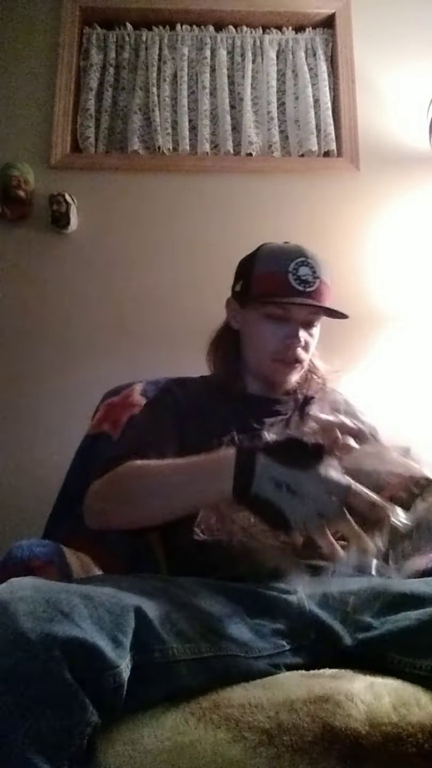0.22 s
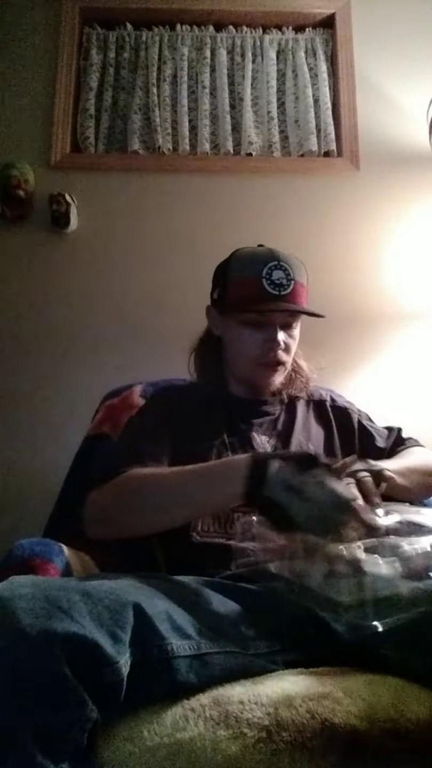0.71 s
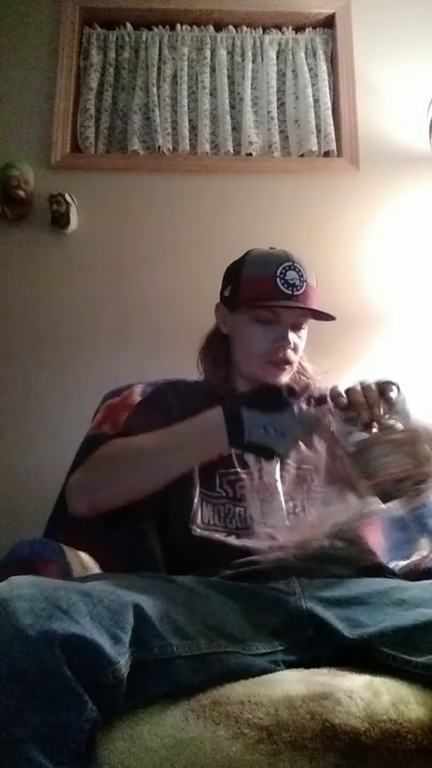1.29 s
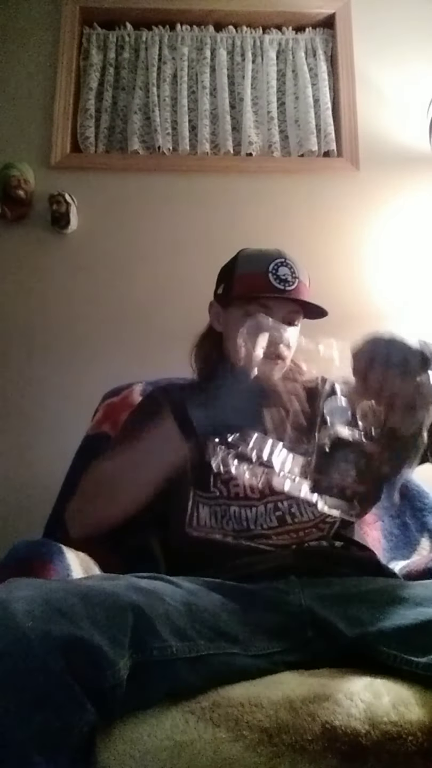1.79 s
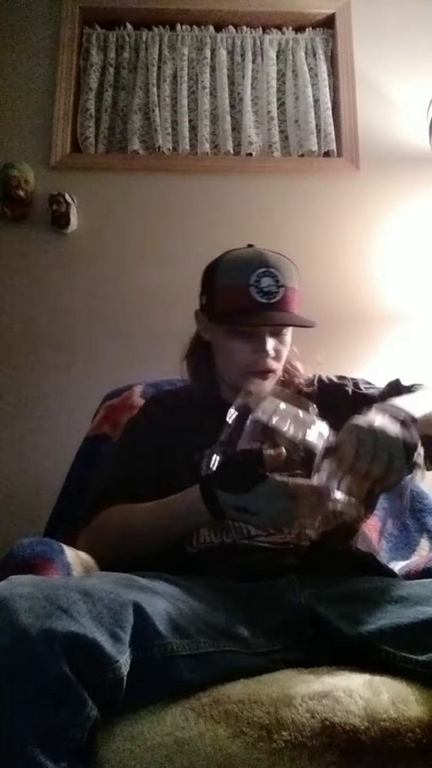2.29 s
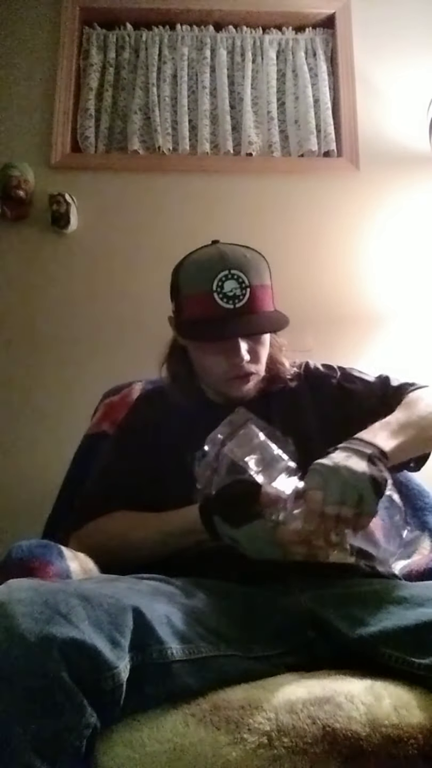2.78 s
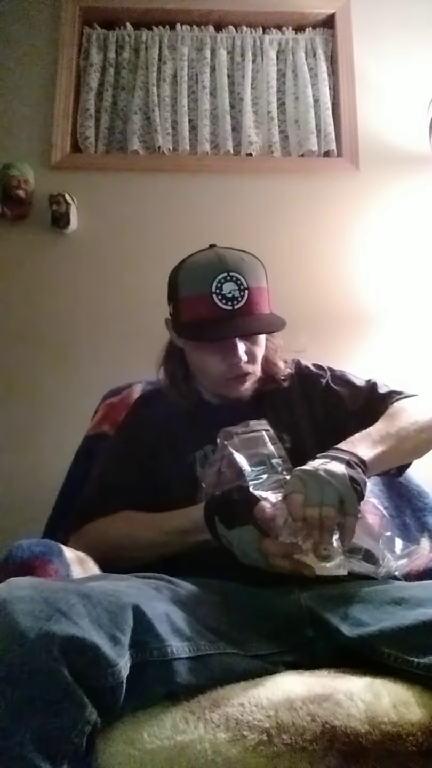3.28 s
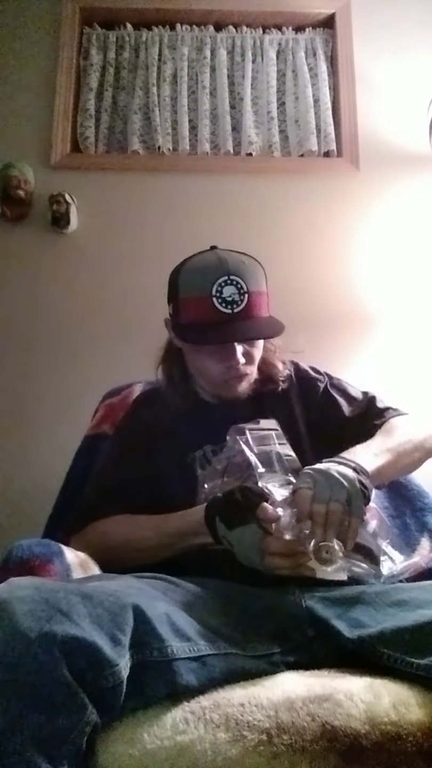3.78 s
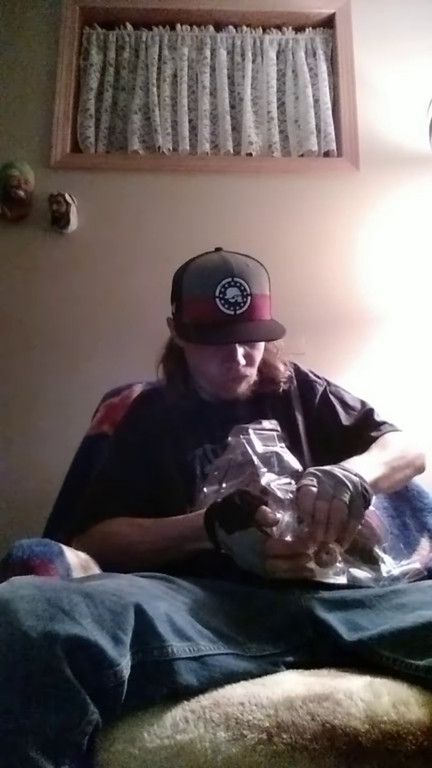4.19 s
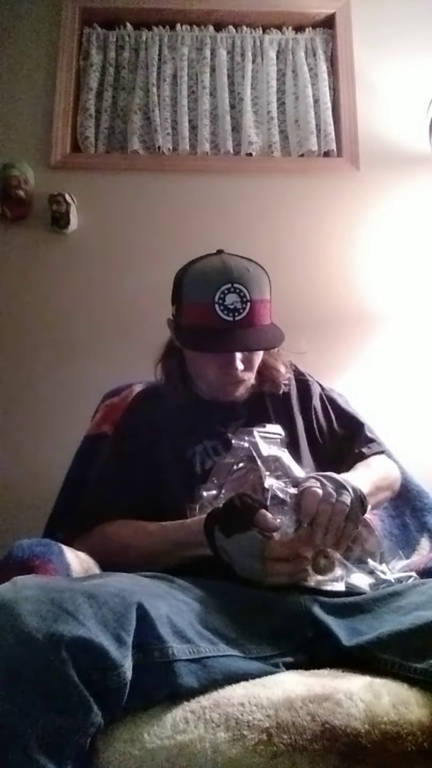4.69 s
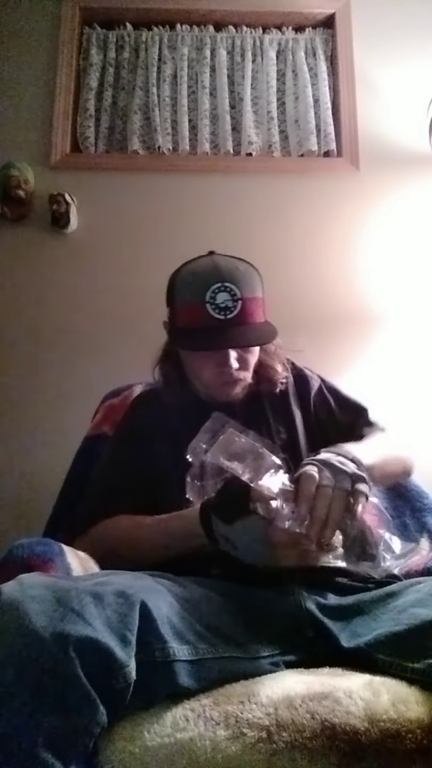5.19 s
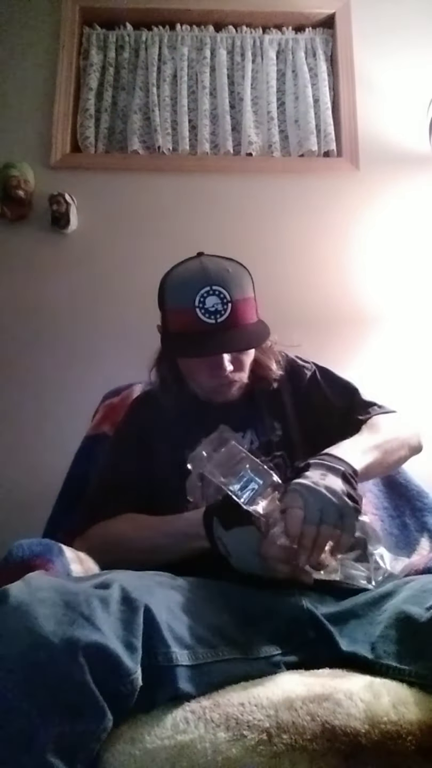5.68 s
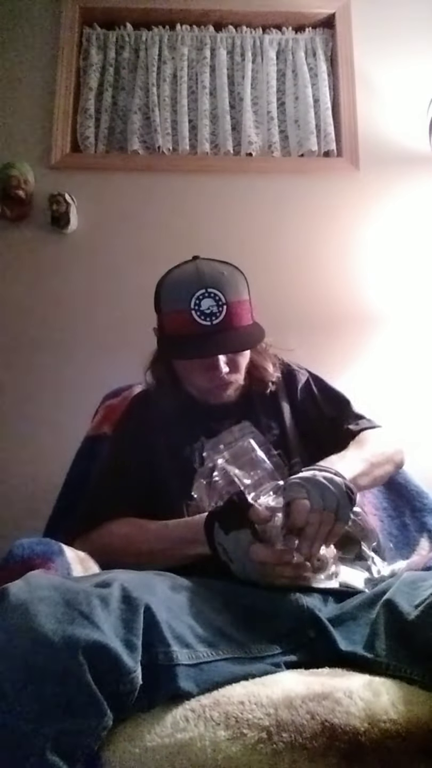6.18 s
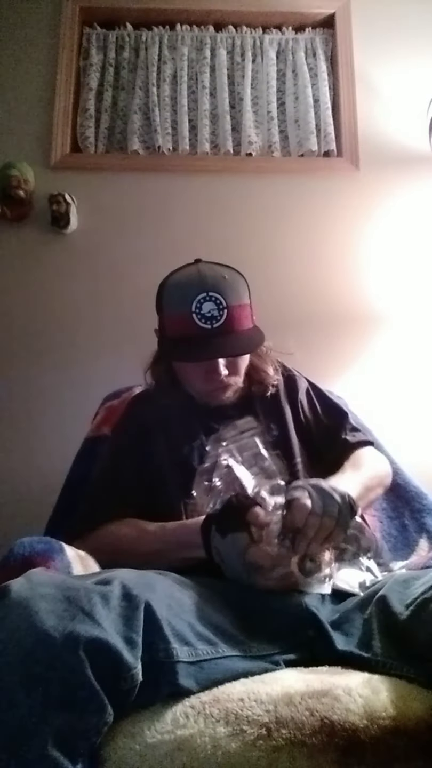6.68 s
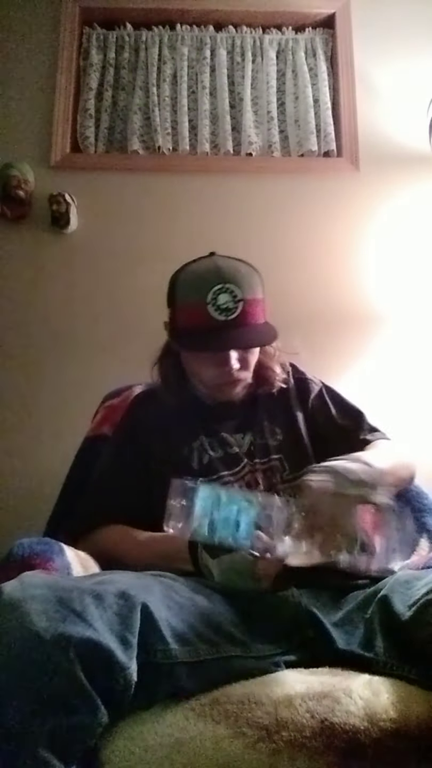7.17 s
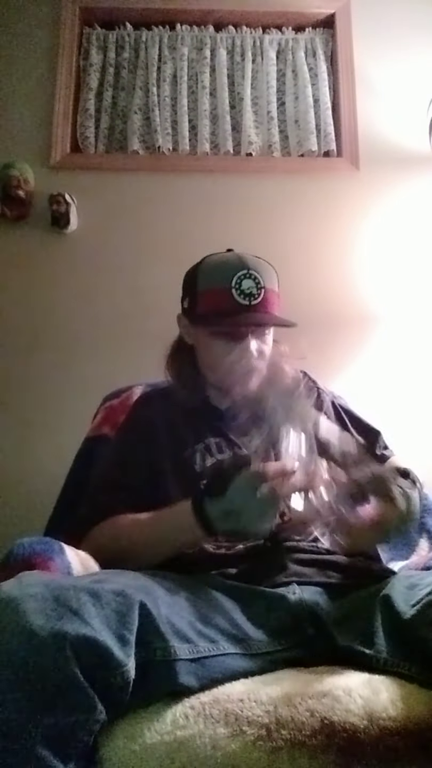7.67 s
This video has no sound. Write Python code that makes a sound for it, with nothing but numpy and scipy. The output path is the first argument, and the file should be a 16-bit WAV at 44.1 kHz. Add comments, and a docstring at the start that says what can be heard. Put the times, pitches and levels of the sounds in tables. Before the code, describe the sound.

Stiff plastic packaging is pulled and crushed by hand near the microphone, crackling irregularly throughout. A small cluster of snaps comes at about 0.3 seconds, followed by a brief lull and louder pops from 1 to 1.5 seconds. Sharp, bright cracks and hollow pops crowd together between 2 and 3 seconds. Uneven crinkling continues, with two tiny creaks and a strong snap around 3.5 seconds, then a loud, rustling crunch near 5 seconds. Lighter, crisp ticks lead into the densest crushing, from about 6.4 to 7 seconds. After a half-second pause, a few duller pops come around 7.6 seconds and die away. Soft, low thumps of hands on lap and chair sit underneath, clearest near 2.5 and 6.5 seconds. The room is small and furnished, with a short echo and a very faint hush.

```python
"""Creases snap in stiff clear plastic packaging as hands pull it apart and crush it.
Each crease that buckles releases its elastic energy as a crack, a bright edge, a knock and the pop
of the panel around it. Between snaps the film rubs, small creases crackle, folds creak by stick-slip
and the hands thud on lap and chair. A small furnished room answers with early echoes and a short
tail, over a faint hush."""
import sys
import numpy as np
from scipy import signal
from scipy.fft import rfft, irfft, next_fast_len
from scipy.io import wavfile

SR = 44100
rng = np.random.default_rng(int(sys.argv[2]) if len(sys.argv) > 2 else 0)


def put_to_file(sound):
    """Save the sound as 16-bit audio at rate SR, in the file named by the first command-line argument."""
    columns = np.atleast_2d(sound).T  # one column per channel
    safe = np.clip(columns, -1, 1)
    whole_steps = np.round(safe * 32767)
    wavfile.write(sys.argv[1], SR, whole_steps.astype(np.int16))


N = 348831


def from_db(db):
    """Amplitude ratio of a level: a factor of ten per 20 dB."""
    return 10 ** (np.asarray(db) / 20)


def rms_one(x):
    """Normalisation to unit mean power."""
    return x / np.sqrt(np.mean(x ** 2) + 1e-20)


def peak_one(x):
    """Normalisation to unit peak amplitude, row by row."""
    return x / (np.abs(x).max(axis=-1, keepdims=True) + 1e-20)


def at_hz(points, hz, column=1):
    """Interpolation of a table along a logarithmic frequency axis."""
    points = np.array(points)
    return np.interp(np.log(hz + 1), np.log(points[:, 0]), points[:, column])


def colour(x, points):
    """Zero-phase filtering by a curve of f/Hz, level/dB."""
    size = next_fast_len(len(x))
    gain = from_db(at_hz(points, np.fft.rfftfreq(size, 1 / SR)))
    return irfft(rfft(x, size) * gain, size)[:len(x)]


def band(x, low_hz, high_hz, order=2):
    """Causal band-pass filtering."""
    sos = signal.butter(order, [low_hz, min(high_hz, .45 * SR)], "band", fs=SR, output="sos")
    return signal.sosfilt(sos, x + 1e-18)


def ring(x, hz, t60):
    """Damped harmonic oscillator driven by x; its free vibration falls 60 dB in t60 seconds."""
    r, w = from_db(-60 / (t60 * SR)), 2 * np.pi * hz / SR
    return signal.lfilter([0, np.sin(w)], [1, -2 * r * np.cos(w), r * r], x + 1e-18)


# Spectrum of the still room: f/Hz, relative spectral level/dB
HUSH_SPECTRUM = [(24, -44), (40, 43), (140, 44), (337, -42), (663, -8.5), (1210, -65), (3060, -64),
                 (8340, -24.5), (11300, 12.5), (16000, 14.5)]

def hush(level_db=-69):
    """Stationary background noise, with most of its power in the bass."""
    return from_db(level_db) * rms_one(colour(rng.standard_normal(N), HUSH_SPECTRUM))


# Early reflections from walls and ceiling: delay/s, level/dB
EARLY_ECHOES = [(.0088, -12), (0.0105, -39.5), (0.018, -35.5), (.0245, -43)]
# Reverberant tail: f/Hz, relative level/dB, T60/s
REVERB_BANDS = [(148.6, -21.5, 0.14), (430, -1.5, 0.12), (1000, -12, 0.26), (2200, -5, 0.17),
                (3740, -10.5, 0.15), (7020, -16.5, 0.26), (9100, -13, 0.17), (13000, -17, 0.12)]

def reflections(smear_t60=.0078):
    """Impulse response: rough surfaces scatter each echo, then a diffuse field decays band by band."""
    t = np.arange(round(.4 * SR)) / SR
    response = np.zeros(len(t))
    for delay, db in EARLY_ECHOES:
        decay = (t >= delay) * from_db(-60 * np.maximum(t - delay, 0) / smear_t60)
        smear = rng.standard_normal(len(t)) * decay
        response += from_db(db) * smear / np.sqrt(np.sum(smear ** 2))
    edges_hz = 60 * 2 ** np.arange(0, 8.6, .5)   # half octaves
    build_up = np.clip((t - .006) / .00096, 0, 1)
    for low, high in zip(edges_hz, edges_hz[1:]):
        hz = np.sqrt(low * high)
        decay = from_db(at_hz(REVERB_BANDS, hz) - 60 * t / at_hz(REVERB_BANDS, hz, column=2))
        response += .063 * build_up * decay * band(rng.standard_normal(len(t)), low, high)
    return response


def room(x, positions=8, moves_per_s=10):
    """Time-varying convolution: the moving packaging fades from one set of reflections to the next."""
    position = np.arange(N) / SR * moves_per_s % positions
    out = x.copy()
    for k in range(positions):
        distance = np.abs((position - k + positions / 2) % positions - positions / 2)
        power_share = np.clip(1 - distance, 0, 1)
        out += signal.oaconvolve(x * np.sqrt(power_share), reflections())[:N]
    return out


# Hands knocking on lap and chair: t/s, peak level/dB, f/Hz
HAND_KNOCKS = [(0.239, -14.5, 109.6), (1.34, -15, 136), (2.494, -10.5, 73), (2.853, -15.5, 111),
               (3.468, -34, 127), (3.556, -39, 90.4), (3.678, -18, 123), (5.025, -30, 125.7),
               (5.206, -27.5, 137), (5.802, -33, 129), (5.943, -18, 88.8), (6.526, -6.5, 91),
               (6.694, -13.5, 91.5), (6.994, -28, 78.1)]

def thuds(cycles=7):
    """Soft impact: a smooth force pulse excites one low, heavily damped mode."""
    out = np.zeros(N)
    for start, db, hz in HAND_KNOCKS:
        i = round(start * SR)
        force = np.zeros(min(N - i, 9000))
        force[:200] = np.hanning(200)   # 4.5 ms of contact
        out[i:i + len(force)] += from_db(db) * peak_one(ring(force, hz, cycles / hz))
    return out


def flicker(per_s, depth_db):
    """Random amplitude modulation: the level glides between normally distributed values."""
    steps = rng.standard_normal(round(N / SR * 60) + 2)
    return from_db(depth_db * np.interp(np.arange(N) / SR * per_s, np.arange(len(steps)), steps))


def grains(per_s, spread_db, pitches_hz, cycles):
    """Shot noise: random impulses of uneven size, each exciting one short resonance."""
    sizes = from_db(spread_db * np.minimum(rng.exponential(1, N), 4)) * rng.choice([-1, 1], N)
    impulses = sizes * (rng.random(N) < per_s / SR)
    mode = rng.integers(0, len(pitches_hz), N)
    return rms_one(sum(ring(impulses * (mode == k), hz, cycles / hz) for k, hz in enumerate(pitches_hz)))


def stirred(steady_db, snap_times, stir_db, t60=.14):
    """Incoherent addition: the gain of a steady power plus the decaying power that each snap leaves."""
    jolts = np.zeros(N)
    jolts[np.round(snap_times * SR).astype(int)] = from_db(2 * stir_db)
    settling = signal.lfilter([1], [1, -from_db(-120 / (t60 * SR))], jolts + 1e-18)
    return np.sqrt(from_db(2 * steady_db) + settling)


# Course of the handling: t/s, rubbing level/dB, panel rumble level/dB
HANDLING_LEVELS = [(0,-49,-38.5),(.12,-41.5,-38),(.48,-39,-32.5),(.66,-60,-50),(.85,-46.5,-68),(.98,-57.5,-44),(1.1,-38.5,-43.5),(1.47,-38,-21),(1.7,-64.5,-57.5),(2.02,-62,-66),(2.14,-38.5,-32),(2.65,-44,-37.5),(3.2,-67,-70.5),(3.6,-33.5,-34),(3.9,-52.5,-64),(4.3,-50.5,-48.5),(4.72,-74.5,-63.5),(4.86,-23.5,-31),(5.07,-31.5,-21.5),(5.17,-51,-39),(5.7,-53,-59),(6.3,-54.5,-67),(6.75,-35.5,-31.5),(7.0,-46,-21.5),(7.17,-67.5,-54),(7.385,-66,-68),(7.408,-36,-43),(7.55,-81,-72),(7.91,-78,-60)]
# Film sliding on film: f/Hz, relative spectral level/dB
FRICTION_SPECTRUM = [(1500, -31), (2600, -11.5), (4300, -4), (5300, -5.5), (6800, -3.5), (8500, -5.5),
                     (11000, -4), (16000, -13.5)]

def handling():
    """Friction and flexure: film rubs, small creases tick, panels bend with the cloth under them."""
    times, *levels = np.transpose(HANDLING_LEVELS)
    rub_db, rumble_db = [np.interp(np.arange(N) / SR, times, db) for db in levels]
    rub = rms_one(colour(rng.standard_normal(N), FRICTION_SPECTRUM)) * flicker(per_s=40, depth_db=2.5)
    creases = grains(per_s=500, spread_db=4, pitches_hz=np.geomspace(5500, 15000, 6), cycles=6)
    panels = grains(per_s=2500, spread_db=4, pitches_hz=np.geomspace(330, 2400, 10), cycles=6.2)
    cloth = grains(per_s=170, spread_db=1, pitches_hz=np.geomspace(60, 200, 4), cycles=8.1)
    snap_times, _, pop_db, crack_db, _ = np.transpose(BUCKLING_CREASES)
    film_gain = stirred(rub_db, snap_times, crack_db - 26)
    flex_gain = stirred(rumble_db, snap_times, pop_db - 18)
    return film_gain * (rub + creases) + flex_gain * (panels + from_db(-11) * cloth)


# Creaking folds: start t/s, end t/s, first and last slip rate/Hz, panel level/dB, film level/dB
SLIPPING_FOLDS = [(3.29, 3.353, 230, 280, -28, -29), (3.4925, 3.536, 210, 370, -32, -21)]
# Modes of a fold, the panel's first, then the film's: f/Hz, T60/s, relative level/dB
FOLD_MODES = [(1650, .012, 0), (3950, .006, -8), (5500, .005, -2), (7000, .006, -2), (14500, .003, -5)]

def creaks(unevenness=.2):
    """Stick-slip friction: a fold yields in quick, nearly periodic slips that ring panel and film."""
    (panel_hz, panel_t60, _), *film_modes = FOLD_MODES
    out = np.zeros(N)
    for start, stop, first_rate, last_rate, panel_db, film_db in SLIPPING_FOLDS:
        i = round(start * SR)
        n = round(stop * SR) - i
        jitter = np.repeat(rng.standard_normal(n), 150)[:n]
        slip_rate = np.linspace(first_rate, last_rate, n) * from_db(8.7 * unevenness * jitter)
        slip_count = np.floor(np.cumsum(slip_rate / SR))
        slips = np.diff(slip_count, prepend=-1) * from_db(rng.normal(0, 1.5, n))
        slips = np.pad(slips, (0, 600))   # time to ring out
        panel = band(ring(slips, panel_hz, panel_t60), .75 * panel_hz, 1.4 * panel_hz)
        film = sum(from_db(db) * ring(slips, hz, t60) for hz, t60, db in film_modes)
        out[i:i + len(slips)] += from_db(panel_db) * panel + from_db(film_db) * film
    return out


def bursts(noise, release_s):
    """Broadband transients, one per row: noise swells and decays, and its spectrum is whitened."""
    age = np.arange(noise.shape[1]) / SR / release_s[:, None]
    envelope = (1 - np.exp(-age / .038)) * from_db(-60 * age)
    spectrum = rfft(noise * envelope)
    whitened = irfft(spectrum / (np.abs(spectrum) + 1e-20), noise.shape[1])
    return whitened * envelope ** .3   # trims what whitening spreads in time


def panel_pops(kicks, pitches_hz, cycles=9):
    """Forced vibration: each kicked panel rings at its pitch over a broader body reaching below it."""
    tones = [ring(kick, hz, cycles / hz) for kick, hz in zip(kicks, pitches_hz)]
    bodies = [band(kick, hz / 2.4, hz * 1.7, order=3) for kick, hz in zip(kicks, pitches_hz)]
    return peak_one(np.array(tones)) + .91 * peak_one(np.array(bodies))


# Snaps of the creases: t/s, panel f/Hz, pop level/dB, crack level/dB, bright edge level/dB
BUCKLING_CREASES = [(0.066,1700,-27,-18,-20),(0.2029,1005,-23,-30,-21.5),(.3084,900,-24.5,-38,-10),(0.3173,910,-17,-30,-7),(.323,1190,-45,-10,-7),(.337,1220,-23.5,-9.5,-12.5),(0.3457,1510,-12.5,-16,-3),(0.385,1170,-9.5,-11.5,-11),(.6254,1900,-29.5,-38,-52),(0.7106,1210,-60,-50,-23),(0.7648,1230,-20.5,-33,-43),(0.894,2040,-36,-48,-41),(0.953,1190,-29.5,-57,-50),
                    (1.002,500,-21.5,-17.5,-28),(1.0152,622,-14,-9,-13),(1.0434,647,-23.5,-10,-6),(1.0595,1260,-9,-14,-7),(1.1773,1770,-14.5,-44,-33),(1.1969,1005,-12,-11.5,-16),(1.2153,640,-9,-14,-24.5),(1.2465,960,-14.5,-11.5,-34),(1.253,1860,-13,-10,-17.5),(1.3191,1280,-22.5,-27,-29.5),(1.3363,1660,-5,-1.5,-3.5),(1.407,1000,3,3,-9.5),(1.4363,1018,-24,-10.5,-20),(1.5362,1280,-19.5,-23.5,-20),(1.6191,583,-13,-28.5,-30),(1.692,544,-42.5,-18.5,-24),(1.7596,2150,-34.5,-27,-17.5),(1.803,2260,-49,-14.5,-8),(1.81,2260,-41,-10,-20),(1.825,1540,-66,-17,-6),(1.9447,572,-33,-27,-14.5),(1.978,1570,-51,-27.5,-16),
                    (2.009,2200,-31,-37,-33),(2.04,1580,-16,-8.5,-3),(2.0918,1490,-1,12.5,-15),(2.1283,1590,-12,-22,-6),(2.1867,580,-17,-18.5,-16),(2.224,1500,-11,-2,7),(2.235,1670,-18,-19,-1.5),(2.2609,530,-16.5,1,8),(2.3143,510,-17.5,-8,-15),(2.323,1370,-13,-16,-25),(2.4028,2200,-8.5,-5.5,-1),(2.44,520,-27,-40,-45),(2.4587,860,-5.5,2,3.5),(2.4915,1355,6,8,12),(2.5524,1490,-14,-0.5,-6.5),(2.6016,1410,0.5,4.5,-5),(2.6117,1270,-6,-0.5,-17),(2.671,1576,-14.5,-15.5,-41),(2.7688,1584,-49,-20,-23),(2.7939,1630,-25,-11,-3),(2.801,1430,-47,-2.5,-26),(2.8205,1440,-18.5,-15,-14),(2.8463,1885,-0.5,5.5,6),(2.9707,1540,-8.5,-0.5,-3.5),
                    (3.015,1840,-15.5,-14.5,-12),(3.0716,2220,-12,-8.5,-14),(3.1135,2500,-26.5,-4,-19),(3.152,1300,-25,-2.5,1),(3.17,1390,-53,-32,-4),(3.264,1820,-36,-38,-39),(3.2772,1730,-46,-20.5,-15),(3.3569,2080,-44.5,-13,-10),(3.415,2500,-38.5,-23,-30),(3.4298,1650,-8.5,-17,-21),(3.4515,1550,-20.5,-22,-36.5),(3.4743,1640,-36,-22,-32),(3.4862,1710,-39,-19,-35),(3.5391,1260,-10.5,-14,-20),(3.552,1100,-11.5,-25.5,-23),(3.5674,1166,-1,9.5,9.5),(3.662,1250,-7.5,-5,1.5),(3.7106,2195,-12.5,1.5,4),(3.75,1200,-42,-26,-21),(3.777,1200,-40,-20.5,-20),(3.798,980,-28,-4.5,-11),(3.828,1500,-34,-27,-31),(3.865,1500,-39.5,-25,-32),(3.885,1500,-49,-37,-22),(3.917,2150,-35,-29,-24),(3.9293,830,-25,-20,-32.5),(3.9357,1204,1,3.5,-3.5),
                    (4.0429,1240,-22.5,-13,-5),(4.071,1390,-20,-16,-1),(4.1035,1140,-8,-1.5,4.5),(4.133,1740,-22,-12,-22),(4.1955,1190,-19.5,-16,-13),(4.2039,1010,-22,-8,-5),(4.233,2400,-23,-7.5,-3),(4.2555,890,-32.5,-27,-25),(4.3482,1090,-10.5,-7.5,-2),(4.3944,517,-15.5,-5.5,-21),(4.45,1350,-27,-13.5,-11),(4.5245,1410,-46,-15.5,-4.5),(4.536,850,-34,-29,-10),(4.5722,1100,-4.5,4,2),(4.597,1030,-20.5,-30.5,-11.5),(4.681,1980,-41,-41,-26),(4.7566,1400,-37,-10.5,-5),(4.8066,1010,-62.5,-10.5,-4),(4.8103,1200,-56,-25,0),(4.828,1110,-8.5,-14,-9),(4.8443,1700,-22,-6,-8.5),(4.8627,1950,-5.5,-12,1.5),(4.8871,880,-8,-12,-12.5),(4.8992,613,-7.5,1,18.5),(4.9176,750,-3.5,6.5,-3),(4.9437,1750,-4,-26,-24),(4.9636,1320,-2.5,10,14),(4.9964,1296,-7,-4,-11),
                    (5.025,1270,-3.5,-2,2),(5.036,2020,-13,-21,-3),(5.0633,1320,-6.5,-6.5,-15),(5.0791,1274,-14.5,-9,-3),(5.1015,1950,-17,-33,-14),(5.1687,2440,-23.5,-13,-40),(5.2168,2440,-5,-6.5,-5),(5.2701,1270,-11.5,-10.5,-5.5),(5.2793,2340,-33,-8,-14),(5.299,1360,-39.5,-7.5,-7),(5.323,1000,-22,-14,-32),(5.3358,2440,-18.5,-9.5,-19),(5.369,2400,-22,-10.5,-19),(5.401,1190,-25,-29,-30),(5.414,1160,-21,-19,-19),(5.4512,1140,-27,-7,-12),(5.4563,1300,-10.5,-18.5,-17),(5.476,1300,-30.5,-24,-17.5),(5.5023,1250,-46,-12,-19),(5.512,1270,-54,-11,-4),(5.5244,2140,-18,-7.5,6),(5.548,2370,-54,-28,-3.5),(5.5732,2560,-16,-2,-31),(5.6009,2350,-41,-31,-3),(5.6161,2500,-21,-11,-4.5),(5.6459,945,-24,-21,0),(5.67,850,-43,-19,0),(5.7125,2380,-37,-24,-5),(5.7411,770,-27.5,5.5,10),(5.8137,1470,-13.5,-19,-21),(5.8577,710,-24,-30,-19),(5.8805,1180,-10,-47,-34),(5.9432,1210,-4.5,-0.5,-4),(5.9576,453,-7.5,-24,-19),(5.976,1240,-15,-23,-6.5),
                    (6.024,520,-51,-29,-16),(6.0645,1860,-23.5,-17,-14),(6.0782,550,-14.5,-28,2),(6.092,1400,-31.5,-12.5,-17),(6.109,1380,-31,-18.5,-7),(6.1286,1100,-18.5,7,14),(6.1375,2070,-18.5,-24,-0.5),(6.171,2120,-23,-7.5,-8.5),(6.214,1590,-35,-21,-6.5),(6.246,1000,-48,-20,-16),(6.2573,960,-65,-19.5,-5),(6.2846,2540,-18.5,-14,-29),(6.325,1000,-45,-29.5,-25),(6.334,1000,-48,-28,-26),(6.366,890,-10,-10,-15),(6.3909,1630,-2.5,2.5,10),(6.438,1800,-1,6,-3),(6.5232,1940,-8,11,13.5),(6.5337,1920,-4,-6,2.5),(6.5489,642,-9,1,-18),(6.573,1920,-12.5,-3.5,2.5),(6.643,1577,-12.5,-17.5,-17.5),(6.6702,617,-11,-31.5,-22.5),(6.7088,508,-11,-9.5,-24),(6.7273,562,-6,-9.5,-21),(6.7557,468,-5.5,-14.5,-31),(6.7679,1550,-2,-1,3.5),(6.7943,1216,-4.5,3,-17),(6.8043,1210,-9.5,-5.5,-11),(6.8249,1250,-8,1,5),(6.8305,481,-6.5,11,5),(6.8392,1220,-13,-15,-8),(6.8662,1230,-4,-4.5,-17.5),(6.8945,1230,-2.5,-2,3.5),(6.936,2530,1,0.5,-19),(6.965,554,-9.5,5.5,-5),(6.9876,1270,-16,-9,11.5),
                    (7.0006,1214,5,-0.5,0),(7.062,835,-9,-18,-34),(7.101,1180,-36,-46,-50),(7.228,1270,-36.5,-39,-42),(7.542,950,-32.5,-64,-51),(7.6219,782,-5.5,-16,-20),(7.6306,890,0,-7.5,-13),(7.6927,790,-12.5,-10.5,-37),(7.703,2600,-19.5,-26,-35),(7.7546,1200,-6.5,-4,-30),(7.84,690,-41,-29,-36)]

def snaps(size=2560):
    """Snap-through buckling: a crease releases within milliseconds, cracks and kicks its panel."""
    times, panel_hz, pop_db, crack_db, edge_db = np.transpose(BUCKLING_CREASES)
    knock_db = .51 * crack_db + .49 * pop_db - 1   # the knock lies between pop and crack
    # a crease with little panel behind it lets go faster
    backing_db = np.clip(pop_db - np.maximum(crack_db, edge_db), -22, 0)
    scatter = .32 * rng.standard_normal(len(times))
    release_s = np.maximum(.0205 * np.exp(.0957 * backing_db + scatter), .002)
    shake_s = 2.37 * release_s / np.sqrt(panel_hz / 1000)   # large, low panels shake longer
    noise = rng.standard_normal((len(times), 4, size))
    pop = band(panel_pops(bursts(noise[:, 0], shake_s), panel_hz), 267, 3020, order=3)
    knock = band(bursts(noise[:, 1], release_s), 2203, 4750, order=3)
    crack = band(bursts(noise[:, 2], release_s), 4600, 9350, order=4)
    edge = band(bursts(noise[:, 3], release_s), 8240, 14600, order=3)
    parts = [(pop, pop_db), (knock, knock_db), (crack, crack_db), (edge, edge_db)]
    sounds = sum(from_db(db)[:, None] * peak_one(part) for part, db in parts)
    out = np.zeros(N + size)
    for i, sound in zip(np.round(times * SR).astype(int), sounds):
        out[i:i + size] += sound
    return out[:N]


# Frequency response of the microphone: f/Hz, level/dB
MIC_RESPONSE = [(30, -15.5), (100, -15), (250, -5), (600, 1), (1500, 3.5), (3200, 3), (5000, 4),
                (7000, 6.5), (9000, -2), (12000, -4.5), (16000, -2)]

def scene():
    """Linear superposition: the sources, filtered by room and microphone, add to the hush."""
    background = hush()
    sources = snaps() + creaks() + thuds() + handling()
    return (background + colour(room(sources), MIC_RESPONSE))[None]


def record(dry, gain=.84, knee=.84):
    """Saturation and band limiting: the loudest snaps clip softly; deep bass and the top are cut."""
    clipped = gain * dry / (1 + (dry / knee) ** 4) ** .25
    high_pass = signal.butter(2, 60, "high", fs=SR, output="sos")
    low_pass = signal.ellip(12, .5, 70, 16250, fs=SR, output="sos")
    return signal.sosfilt(low_pass, signal.sosfilt(high_pass, clipped))


dry = scene()
out = record(dry)
put_to_file(out)
```